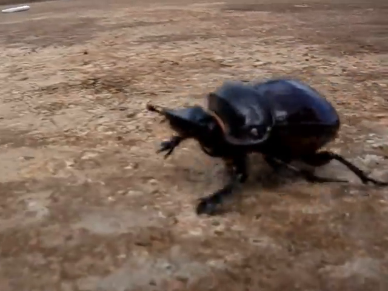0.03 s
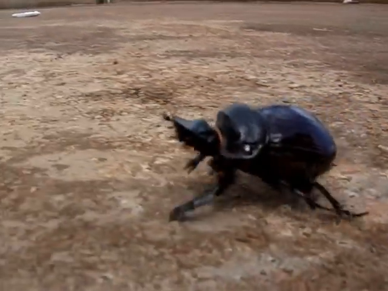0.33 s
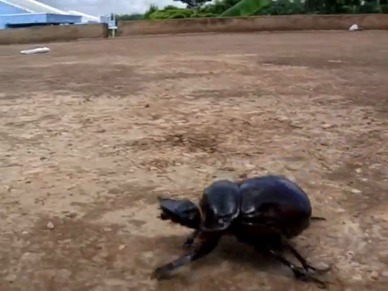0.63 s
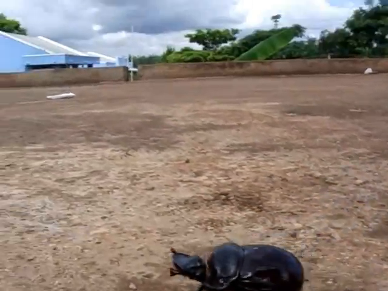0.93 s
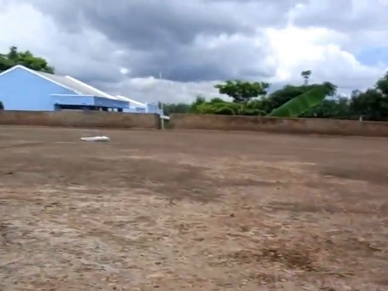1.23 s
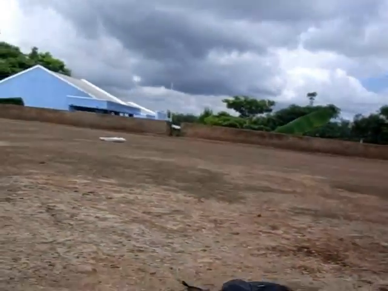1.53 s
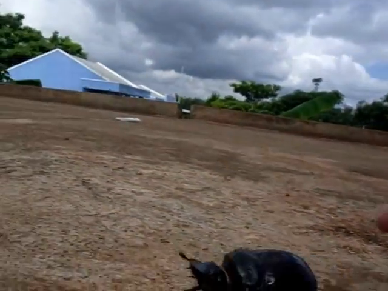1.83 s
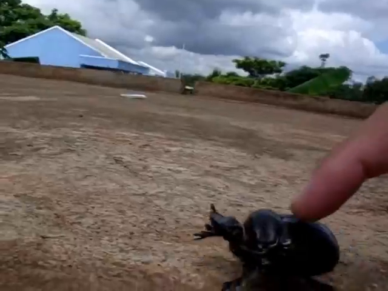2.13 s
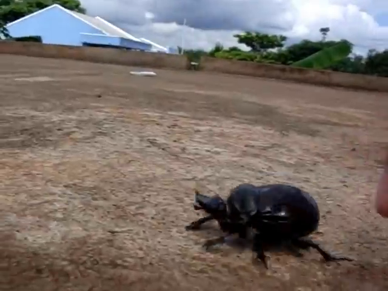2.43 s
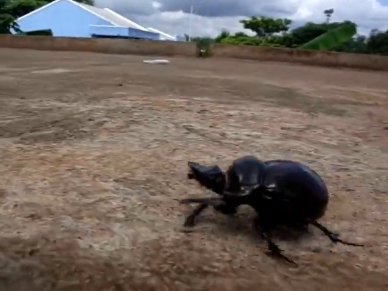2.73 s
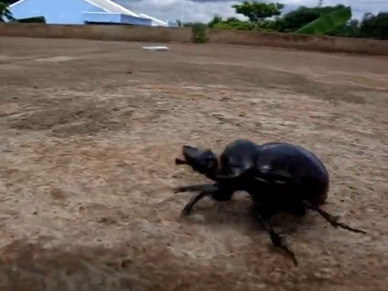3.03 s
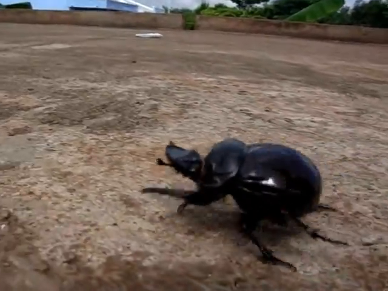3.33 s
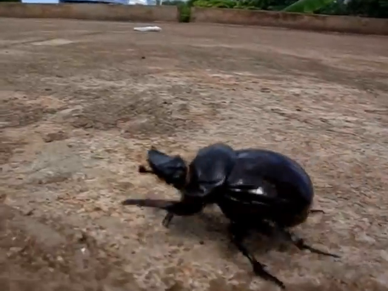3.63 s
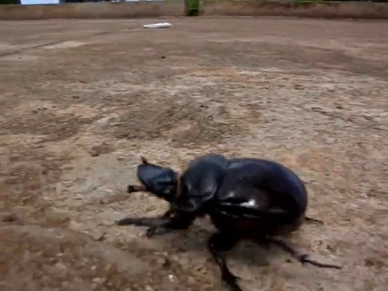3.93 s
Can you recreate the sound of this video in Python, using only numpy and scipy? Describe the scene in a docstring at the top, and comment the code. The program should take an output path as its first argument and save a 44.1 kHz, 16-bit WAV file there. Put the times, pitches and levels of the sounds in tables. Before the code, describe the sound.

A large beetle's pulsing, raspy hiss is the main sound, close up in a quiet yard with far insects. First come faint claw ticks, one chirp and a knock on the microphone; then the rasping starts, over a distant puttering engine.

```python
"""In quiet outdoor air with far insects, a large beetle walks on a concrete yard close to the microphone.
Its claws tick and scrape, a bird chirps once, and at 1.2 s the hand-held recorder is bumped and rubbed.
From 2.35 s, touched by a finger, the beetle stridulates: its abdomen pumps to and fro, dragging two
toothed files under the hard wing cases. Behind the rasp, the putter of a distant engine swells."""
import sys
import numpy as np
from scipy import signal
from scipy.fft import rfft, irfft
from scipy.io import wavfile
from scipy.ndimage import uniform_filter1d

SR = 44100
rng = np.random.default_rng(int(sys.argv[2]) if len(sys.argv) > 2 else 0)


def transcribe(u):
    """Save the signal u as a 16-bit wav file named by the first command-line argument.

    u: samples, shape (n,) or (channels, n), limited to [-1, 1]; the rate is SR.
    q: integer samples, one column per channel.
    """
    v = np.clip(np.atleast_2d(u).T, -1, 1)
    q = np.round(v * 32767).astype(np.int16)
    wavfile.write(sys.argv[1], SR, q)


N = 176400
T = np.arange(N) / SR

# tone of the outdoor air (frequency [Hz], gain [dB])
AIR_COLOUR = [(20, -22), (37, -13), (59, 3), (100, -1), (150, -1), (220, -8), (350, -7), (440, -11),
              (600, -12), (1140, -17), (3300, -18.5), (5500, -21), (7300, -21.5), (10500, -17.5),
              (12000, -23.5)]
# swell of the far insects (time [s], gain [dB])
INSECT_SWELL = [(0, 1), (.8, -3), (1.6, 4), (1.9, 3), (2.3, 2)]
# fade-in of the engine (time [s], level [dB])
ENGINE_FADE = [(0, -95), (1.5, -67), (2.4, -60), (2.8, -50.5), (2.92, -47.5), (3.4, -44.5), (4, -46.5)]
# boom of its exhaust (frequency [Hz], gain [dB])
EXHAUST_COLOUR = [(30, -28), (60, -13.5), (90, 4.5), (125, -3), (170, -13.5), (230, -11.5), (400, -47.5),
                  (2000, -44)]
# bumps on the recorder's case (time [s], level [dB], contact [ms])
BUMPS = [(1.1967, -5, 0.64), (1.2102, -14, 0.92), (1.212, -20, 1.3), (1.274, -22.5, 0.11),
         (1.347, -32, 0.57), (1.456, -26, 0.47), (2.3299, -29.5, .15)]
# dull ring of the case (frequency [Hz], gain [dB], t60 [s])
CASE_MODES = [(190, -11.5, 0.042), (299, -8, 0.037), (380, -12.5, 0.025), (770, -10.5, 0.024),
              (927, -9, 0.02), (1330, -1, 0.008)]
# tone of a finger sliding on the case (frequency [Hz], gain [dB])
RUB_COLOUR = [(100, -14), (400, 3.5), (1000, 0.5), (2500, -14), (8000, -19)]
# clacks as the recorder is handled (time [s], level [dB])
CLACKS = [(1.274, -25), (1.4815, -21), (1.4824, -28), (1.4854, -17), (2.3302, -38)]
# ring of a clack (frequency [Hz], gain [dB], t60 [s])
CLACK_MODES = [(1050, -39, 0.0057), (1840, -7, 0.018), (2200, -8, 0.009), (2680, 0, 0.013),
               (3500, -29, .008), (6300, -21, .012)]
# claw ticks, plus two sharp clacks of the handled recorder at 1.2751 s and 2.33 s (time [s], level [dB],
# relative mid-range knock [dB])
TICKS = [(.487, -28.5, -8), (.526, -29, -20), (.593, -24, -8), (.830, -21.5, -25), (.940, -24.5, -22),
         (.960, -23.5, 2.5), (.964, -23, 2.5), (.974, -18.5, -4.5), (1.017, -15, -10), (1.024, -24, -17),
         (1.037, -16, -23), (1.197, -30.5, 9.5), (1.269, -21, -26), (1.2751, -24, 1), (1.457, -23, 0),
         (1.470, -29, -14), (1.4765, -17.5, -5), (1.486, -13, -15), (1.523, -29, -6), (1.626, -21, -15),
         (1.660, -28, -14), (1.720, -21.5, -9.5), (1.752, -32, 4), (1.794, -36, 6.5), (1.822, -24, -5),
         (1.913, -24.5, -5), (2.017, -36, 7), (2.076, -22, -2), (2.084, -27, -12), (2.310, -32, 1),
         (2.33, -31, 7)]
# leg scrapes (start [s], length [s], level [dB], relative mid-range [dB])
SCRAPES = [(0.017, 0.053, -44, -21), (0.876, .05, -49, -2.5), (0.344, 0.045, -47, -23),
           (0.681, .05, -46, -23), (0.945, 0.041, -43, -0.5), (1.002, 0.12, -36.5, -4.5),
           (1.234, 0.088, -42.5, -5), (1.454, 0.05, -35.5, -2), (1.502, 0.038, -40, -4.5),
           (1.58, .14, -48.5, -5.5), (1.945, 0.076, -44.5, -1), (2.074, .04, -46, -7),
           (2.306, 0.083, -43.5, -2.5)]
# bright snap of a claw (frequency [Hz], gain [dB])
TICK_COLOUR = [(500, -24), (3000, -12.5), (6000, -2.5), (8000, 1.5), (10000, 7.5), (12000, -2.5)]
# duller knock of the grit (frequency [Hz], gain [dB])
GRIT_COLOUR = [(200, 5), (1000, -10), (1800, 5), (2700, 3), (4200, 3), (7000, -2.5), (12000, -15.5)]
# strokes of the abdomen (start [s], end [s], fastest point [share of length], level [dB],
# top tooth rate [Hz], fade at start [dB], fade at end [dB], mid ring [dB], hollow ring [dB])
STROKES = [(2.350, 2.369, 0.51, -16.5, 2196, -10, -8, -0.5, -1),
           (2.369, 2.484, .2, -12.5, 3400, -5.5, -6, -2.5, -17),
           (2.483, 2.568, .55, -15.5, 2398, -7, -2, -1.5, 0), (2.568, 2.646, .28, -15, 2553, -5, -4, -1, 0),
           (2.646, 2.708, 0.69, -16, 3054, -4.5, 1.5, 2, 1.5),
           (2.708, 2.754, 0.26, -13.5, 2692, -3, -9.5, -0.5, -3),
           (2.760, 2.896, .42, -15, 2445, -3, -3.5, -2, -2.5),
           (2.897, 3.004, .38, -12, 2900, -10, -8.5, -2.5, 2.5),
           (3.005, 3.159, 0.49, -15.5, 2203, -4.5, -6.5, -1.5, -1),
           (3.167, 3.270, 0.41, -11, 3145, -13, -11, -1, 0.5),
           (3.271, 3.406, 0.52, -15.5, 2401, -4.5, -4, -1.5, 1),
           (3.406, 3.462, 0.5, -18.5, 1705, -3.5, -2.5, -0.5, 5),
           (3.462, 3.555, .33, -12.5, 3013, -8.5, -9, -2, 6.5),
           (3.556, 3.608, .15, -16, 1098, -2, -7, -1, 4), (3.608, 3.698, .35, -16.5, 2998, 1, -2, 0, 3),
           (3.699, 3.753, .30, -16.5, 1151, -2.5, -7, -3.5, 5.5),
           (3.753, 3.835, .46, -12, 3244, -9, -11, -1, 6),
           (3.836, 3.906, .25, -14.5, 2306, -3, -8.5, -4, 5),
           (3.903, 4.007, .45, -17, 2002, -3.5, -3, 0.5, 5)]
# the two files (tooth rate [share], level [dB], spacing scatter [share], strength scatter [dB])
FILES = [(0.99, 0.5, .13, 1.6), (.43, -2.5, .16, 2.5)]
# bright edge of the wing cases (frequency [Hz], gain [dB])
SHELL_EDGE = [(300, -65), (2000, -50), (3900, -23.5), (4600, -15.5), (5500, -10), (6300, -5.5), (7200, -5),
              (7900, -1), (8900, -1), (9700, 2.5), (10900, 2), (12500, -8)]
# their mid ring (frequency [Hz], gain [dB])
SHELL_BODY = [(300, -38), (800, -21.5), (1600, -9), (2200, -2), (3100, 2.5), (4000, -1), (5500, -5.5),
              (8000, -23), (12000, -38)]
# the hollow beneath them (frequency [Hz], gain [dB])
SHELL_HOLLOW = [(300, -19), (600, -6.5), (950, -0.5), (1300, 1.5), (1650, -9), (3000, -25), (8000, -40)]

TURN_RATE_HZ = 900  # tooth rate where a stroke turns
FULL_BITE_HZ, SLOW_BITE_DB = 2500, -8.5  # below this tooth rate the second file and friction fall away
# slower strokes chatter: timing jitter in tooth periods, and the top rates over which it dies away
CHATTER, CHATTER_FADE_HZ = .2986, (2550, 3000)


def amp(db):
    """Decibels to gain."""
    return 10 ** (np.asarray(db) / 20)


def unit(x):
    """Scale to rms 1."""
    return x / np.std(x)


def drift(rate_hz):
    """Smooth random modulation with a spread of 1."""
    hold = int(SR / rate_hz)
    return unit(uniform_filter1d(np.repeat(rng.standard_normal(N // hold + 1), hold), hold)[:N])


def low_cut(x, hz):
    """Roll off the bass at 12 dB per octave."""
    return signal.sosfilt(signal.butter(2, hz, "high", fs=SR, output="sos"), x)


def colour(x, points, size=8192):
    """Ring x through a causal response of unit energy with the given spectrum."""
    hz, db = np.array(points).T
    gain = amp(np.interp(np.log(np.fft.rfftfreq(size, 1 / SR) + 1), np.log(hz), db))
    cepstrum = irfft(np.log(gain))
    cepstrum[1:size // 2] *= 2  # fold to minimum phase, so attacks stay sharp
    cepstrum[size // 2 + 1:] = 0
    response = irfft(np.exp(rfft(cepstrum)))
    return signal.fftconvolve(x, response / np.linalg.norm(response))[:N]


def clicks(times, sizes, order=6):
    """Impulses at exact times, spread over neighbouring samples."""
    at = np.asarray(times)[:, None] * SR
    taps = at.astype(int) + np.arange(1 - order, order + 1)
    weights = np.sinc(taps - at) * np.sinc((taps - at) / order) * np.asarray(sizes)[:, None]
    return np.bincount(np.clip(taps, 0, N).ravel(), weights.ravel(), N + 1)[:N]


def ring(x, modes):
    """Strike a set of decaying modes."""
    t = T[:N // 20]
    response = sum(amp(db - 60 * t / t60) * np.cos(2 * np.pi * hz * t) for hz, db, t60 in modes)
    return signal.fftconvolve(x, response)[:N]


def swell(start, length):
    """A rounded rise and fall."""
    return np.sqrt(np.abs(np.sin(np.pi * np.clip((T - start) / length, 0, 1))))


def grains(per_s, spread_db):
    """Random tiny impacts of uneven size, rms 1."""
    hits = (rng.random(N) < per_s / SR) * rng.choice([-1, 1], N)
    return unit(hits * amp(spread_db * rng.standard_normal(N)))


def air(level_db=-45.5):
    """A soft, barely wavering bed of outdoor air."""
    return colour(rng.standard_normal(N), AIR_COLOUR) * amp(level_db + .4 * drift(12))


def insects(hz=4630, width_hz=680, level_db=-60):
    """Far insects blur into one thin, shimmering band."""
    band = [(hz + widths * width_hz, db) for widths, db in
            [(-2, -40), (-.5, -5), (0, 0), (.5, -5), (2, -40)]]
    swell_db = np.interp(T, *np.array(INSECT_SWELL).T)
    return colour(rng.standard_normal(N), band) * amp(level_db + swell_db + 1.3 * drift(14))


def bird(start=.392, length=.066, from_hz=4000, to_hz=2800, level_db=-47):
    """One falling chirp with a rough flutter in pitch and level."""
    pitch = np.interp(T, [start, start + length], [from_hz, to_hz]) * (1 + .076 * drift(700))
    envelope = amp(level_db + 2.6 * drift(84.8)) * swell(start, length)
    return envelope * np.sin(2 * np.pi * np.cumsum(pitch) / SR)


def engine(firing_hz=18.6, first_firing_s=.0585):
    """Slow firings of a far single cylinder thump through its exhaust."""
    times = first_firing_s + np.arange(80) / firing_hz
    firings = clicks(times, amp(1.4 * rng.standard_normal(len(times))))
    return unit(colour(firings, EXHAUST_COLOUR)) * amp(np.interp(T, *np.array(ENGINE_FADE).T))


def case_bumps():
    """Rounded pushes ring the recorder's case: the longer the contact, the duller the knock."""
    push = np.zeros(N)
    for time, db, contact_ms in BUMPS:
        half_s = contact_ms / 2000
        push += amp(db) * np.exp(-((T - time) / half_s) ** 2) / (np.sqrt(np.pi) * half_s * SR)
    return low_cut(ring(push, CASE_MODES), hz=170)


def finger_rub(start=1.222, length=.07, level_db=-37.5):
    """A finger slides on the case with a short, muffled friction noise."""
    return amp(level_db) * colour(swell(start, length) * grains(per_s=1500, spread_db=1), RUB_COLOUR)


def handling_clacks():
    """The handled recorder clacks sharply, each hit with a brief ring."""
    times, db = np.array(CLACKS).T
    return ring(clicks(times, amp(db)), CLACK_MODES)


def legs(tick_decay_s=.0011, strays_per_s=16):
    """Claws tick on the concrete and drag over its grit, with faint stray ticks in between; two clacks of the
    handled recorder snap the same way."""
    bright, dull = np.zeros((2, N))
    for time, db, mid_db in TICKS:
        burst = .5 * amp(db) * (T >= time) * np.exp(-np.abs(T - time) / tick_decay_s)
        bright += burst
        dull += amp(mid_db) * burst
    bright *= rng.standard_normal(N)
    dull *= rng.standard_normal(N)
    for start, length, db, mid_db in SCRAPES:
        drag = amp(db) * swell(start, length) * grains(per_s=2500, spread_db=5)
        bright += drag
        dull += amp(mid_db) * drag
    strays = amp(-35) * (rng.random(N) < strays_per_s / SR) * rng.uniform(1, 4.9, N)
    return colour(bright + strays, TICK_COLOUR) + colour(dull, GRIT_COLOUR)


def abdomen(tremor_db=.58):
    """Each stroke speeds up and slows down, driving tooth rate, force, chatter and the shell's ring."""
    rate = np.full(N, float(TURN_RATE_HZ))
    force, chatter = np.zeros((2, N))
    body_send, hollow_send = np.ones((2, N))
    for start, end, fastest, db, top_hz, in_db, out_db, body_db, hollow_db in STROKES:
        on = (T >= start) & (T < end)
        phase = np.interp((T[on] - start) / (end - start), [0, fastest, 1], [0, .5, 1])
        speed = np.sin(np.pi * phase)
        rate[on] = TURN_RATE_HZ + (top_hz - TURN_RATE_HZ) * speed ** .6
        force[on] = amp(db + np.where(phase < .5, in_db, out_db) * (1 - speed))
        chatter[on] = speed * np.interp(top_hz, CHATTER_FADE_HZ, [CHATTER, 0])
        body_send[on], hollow_send[on] = amp(body_db * speed), amp(hollow_db)
    force = uniform_filter1d(force, size=130) * amp(tremor_db * drift(90))
    return rate, force, chatter, body_send, hollow_send


def toothed_file(rate, chatter, scatter, scatter_db, speed_wobble=.12):
    """A file drags at a wobbling speed: one click for each unevenly spaced tooth, rms 1."""
    hz = rate * np.exp(speed_wobble * drift(170))
    gap, strength, jitter = rng.standard_normal((9000, 3)).T
    travel = np.cumsum(hz) / SR
    positions = np.cumsum(np.exp(scatter * gap))
    times = np.interp(positions[positions < travel[-1]], travel, T)
    times += np.interp(times, T, chatter / hz) * jitter[:len(times)]
    return unit(clicks(times, amp(scatter_db * strength[:len(times)])) / np.sqrt(hz))


def stridulation(friction_db=-8.5, body_db=-15.5, hollow_db=-33.5):
    """Two files ring the wing cases: single tooth clicks at the turns, a dense rasp in mid-stroke."""
    rate, force, chatter, body_send, hollow_send = abdomen()
    first, second = (amp(db) * toothed_file(share * rate, chatter, scatter, scatter_db)
                     for share, db, scatter, scatter_db in FILES)
    roughness = second + amp(friction_db) * rng.standard_normal(N)
    bite = amp(np.interp(rate, [TURN_RATE_HZ, FULL_BITE_HZ], [SLOW_BITE_DB, 0]))
    teeth = (first + bite * roughness) / np.sqrt(1 + bite ** 2 * np.var(roughness))  # even-power blend
    rasp = low_cut(teeth, hz=500) * force
    body = amp(body_db) * colour(rasp * body_send, SHELL_BODY)
    hollow = amp(hollow_db) * colour(rasp * hollow_send, SHELL_HOLLOW)
    return colour(rasp, SHELL_EDGE) + body - hollow


def scene():
    """Everything reaches one microphone, the same in both ears."""
    close = stridulation() + legs() + handling_clacks() + case_bumps() + finger_rub()
    background = engine() + air() + insects() + bird()
    return np.tile(close + background, (2, 1))


def record(dry, ceiling=.8, top_hz=11160):
    """The recorder rounds the very highest peaks and cuts the top steeply."""
    rounded = dry / (1 + (dry / ceiling) ** 8) ** (1 / 8)
    high_cut = signal.firwin(601, top_hz, window=("kaiser", 9), fs=SR)
    return signal.fftconvolve(rounded, high_cut[None], mode="same", axes=1)


dry = scene()
out = record(dry)
transcribe(out)
```